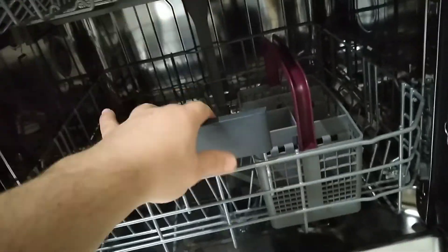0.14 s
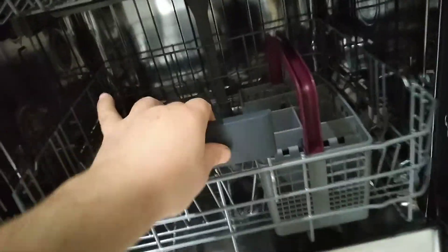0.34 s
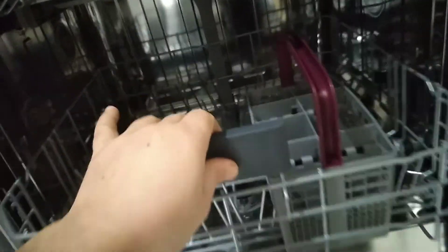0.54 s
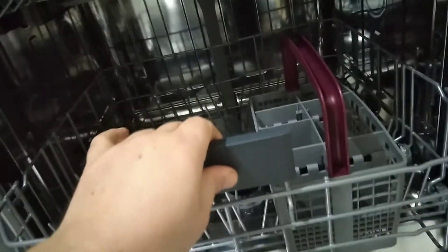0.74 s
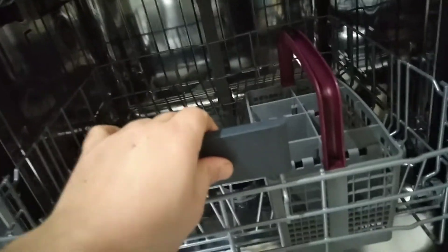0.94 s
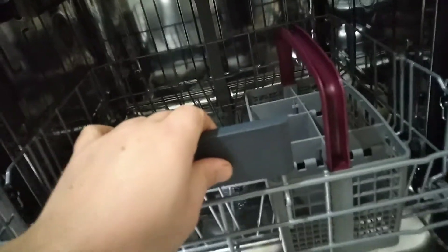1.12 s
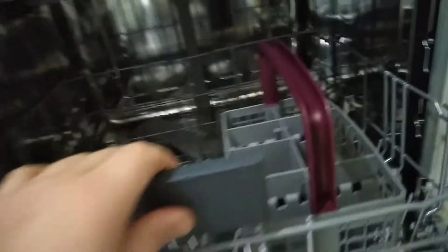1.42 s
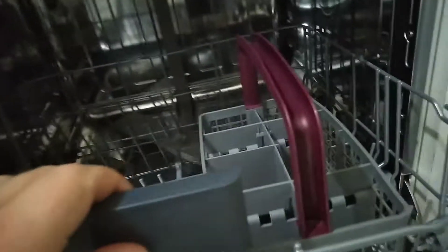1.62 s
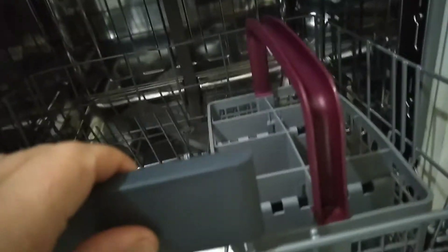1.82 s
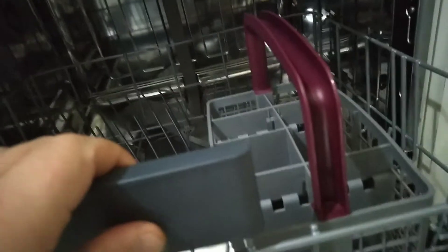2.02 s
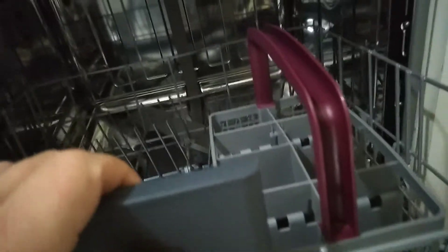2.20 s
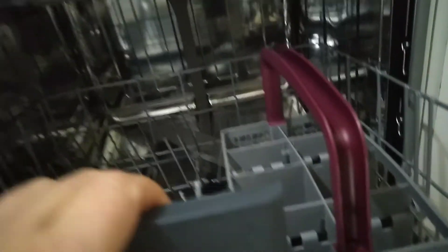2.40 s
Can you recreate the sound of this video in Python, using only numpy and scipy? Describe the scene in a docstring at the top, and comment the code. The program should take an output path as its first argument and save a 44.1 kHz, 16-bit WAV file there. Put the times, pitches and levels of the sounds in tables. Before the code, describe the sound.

A dishwasher rack rattles as it is pulled out, with quick clacks building to a hard bang, then low wheel rumble, thin sliding hiss and a few softer knocks, heard close in a quiet kitchen.

```python
"""Over a quiet kitchen rumble, loose wires chatter and wheels rumble as a dishwasher rack is drawn out.
Rack and plastic cutlery basket knock: each contact excites a clack, decaying modes and a diffuse tub echo.
Dying sinusoids give hollow thunks and wire clicks; coloured noise and gliding bands make the runners hiss.
In the quiet stretches the level drops out abruptly, once stuttering back; a faint whine sets in late."""
import sys
import numpy as np
from scipy import signal
from scipy.fft import rfft, irfft, next_fast_len
from scipy.io import wavfile
from scipy.ndimage import uniform_filter1d, map_coordinates

SR = 44100
rng = np.random.default_rng(int(sys.argv[2]) if len(sys.argv) > 2 else 0)


def store_wav(level_fs):
    """Save 16-bit WAV to argv[1]."""
    pcm = np.round(np.clip(np.atleast_2d(level_fs), -1, 1) * 32767)
    wavfile.write(sys.argv[1], SR, pcm.T.astype(np.int16))


N = 112454  # length [samples]


def amp(db):
    """Decibels to amplitude ratio: 20 dB is a factor of ten."""
    return 10 ** (np.asarray(db) / 20)


def unit(x):
    """Normalisation to a root-mean-square value of 1."""
    return x / np.sqrt(np.mean(x ** 2) + 1e-20)


def along(points, hz):
    """Interpolation of (frequency, value) points on a logarithmic frequency axis."""
    point_hz, value = np.transpose(points)
    return np.interp(np.log(hz + 1), np.log(point_hz + 1), value)


def level(rows):
    """Amplitude envelope, linear in decibels between (time, level) points."""
    return amp(np.interp(np.arange(N) / SR, *np.transpose(rows)))


def wobble(rate):
    """Band-limited random modulation: a spline through `rate` random knots per second."""
    knots = rng.standard_normal(int(N * rate / SR) + 4)
    return map_coordinates(knots, [np.arange(N) * rate / SR])


def filtered(x, response):
    """Linear zero-phase filtering: the spectrum times a real response of frequency."""
    m = next_fast_len(N + SR // 2)
    return irfft(rfft(x, m) * response(np.fft.rfftfreq(m, 1 / SR)), m)[:N]


def noise(colour):
    """Coloured noise of rms 1: white noise shaped by a spectral envelope."""
    white = rng.standard_normal(N)
    return unit(filtered(white, lambda hz: amp(along(colour, hz))))


def floor():
    """Steady background noise: a quiet kitchen rumble of fixed spectrum."""
    # spectrum of the rumble: (frequency [Hz], relative level [dB])
    rumble_colour = [(25, -1), (70, 6.5), (130, -7), (300, -25), (1000, -40), (4000, -44), (15000, -31)]
    return amp(-71.5) * noise(rumble_colour)


def coloured(x, tilt_db, thud_db):
    """Minimum-phase contact filter: harder contacts tilt upward, each spot adds its own resonances."""
    # spectrum of a knock: (frequency [Hz], relative level [dB])
    knock_colour = [(30, -32), (90, -6), (200, -3), (360, 7.5), (750, 3), (1300, -2.5), (2800, -17),
                    (3700, -27.5), (6300, -29), (8000, -39), (15500, -50.5)]
    tilt_top_hz = 7060  # hardness brightens up to here
    spot_depth_db, spot_band_hz = 1.5, 417
    m = 2 * next_fast_len(len(x))
    hz = np.fft.rfftfreq(m, 1 / SR)
    spot = map_coordinates(rng.standard_normal(size=400), [hz / spot_band_hz], mode='mirror')
    spot = spot * np.minimum(hz / 2500, 1)
    db = along(knock_colour, hz) + spot_depth_db * spot
    db = db + tilt_db * np.log2(1 + np.minimum(hz, tilt_top_hz) / 500)
    db = db + thud_db / (1 + (hz / 220) ** 4)
    # folding the cepstrum onto positive time makes the response causal
    cepstrum = irfft(np.log(unit(amp(db))))
    cepstrum[1:m // 2] *= 2
    cepstrum[m // 2 + 1:] = 0
    return irfft(rfft(x, m) * np.exp(rfft(cepstrum)))[:len(x)]


def answer():
    """Impulse response of one contact: a push, a plastic clack and tub echo; apart from it, the rack's modes."""
    # modes of the rack in its tub: (frequency [Hz], relative level [dB], 60 dB decay time [s])
    rack_modes = [(256, -8.5, 1), (377.3, 4, 0.29), (565.6, 3.5, 0.28), (662.3, 2.5, 0.32),
                  (790.4, 3.5, 0.27), (1099, 5, 0.32), (1393, 0, 0.29), (1533, -5, 0.17), (1780, 2.5, .22),
                  (2420, 3, 0.48), (2620, 2, 0.084), (5370, 9, 0.16)]
    # reverberation of the tub: (frequency [Hz], 60 dB decay time [s])
    tub_decay = [(100, 0.62), (300, 0.26), (800, 0.19), (2000, 0.29), (5000, 0.35), (13000, .33)]
    clack_t60_s, push_db, tub_db = 0.038, -13.5, -3.5
    t = np.arange(SR * 2 // 3) / SR

    def unit_energy(x):
        return x / np.linalg.norm(x)

    push = amp(push_db) * (t == 0)
    clack = rng.standard_normal(len(t)) * amp(-60 * t / clack_t60_s)
    ring = 0
    for mode_hz, db, t60 in rack_modes:
        envelope = amp(db + 2 * rng.standard_normal() - 60 * t / t60)
        ring = ring + envelope * np.sin(2 * np.pi * (mode_hz * t + rng.random()))
    # noise whose bands decay at their own rates
    hz, s, z = signal.stft(rng.standard_normal(len(t)), SR, nperseg=256)
    decay = amp(-60 * s / along(tub_decay, hz)[:, None])
    tub = signal.istft(z * decay, SR, nperseg=256)[1][:len(t)]
    return push + unit_energy(clack) + amp(tub_db) * unit_energy(tub), unit_energy(ring)


def struck(tilt_db, thud_db):
    """Superposition of direct contact sound and modal ringing at one hardness."""
    body, ring = answer()
    ring = coloured(ring, tilt_db, thud_db)
    ring = amp(-5) * ring / np.linalg.norm(ring)
    return coloured(body, tilt_db, thud_db) + ring


def chatter():
    """Random impact trains convolved with contact responses; hard contacts only come with strong shaking."""
    # shaking of the loose wires: (time [s], relative level [dB])
    shaking = [(.1, -88.5), (.112, -51), (.19, -49), (.26, -41.5), (.33, -35), (.43, -40), (.56, -34.5),
               (.64, -39.5), (.75, -40.5), (.8, -45.5), (1.2, -50), (1.6, -49.5), (1.9, -69), (2.22, -54.5),
               (2.26, -40.5), (2.34, -51)]
    taps_per_s, scatter_db = 130, 3  # mean rate at each spot, spread of tap strength
    hard_from_db, hard_db = -35.5, -5.5  # shaking below the first weakens the hard contacts further
    soft_tilt_db, hard_tilt_db, soft_edge_hz = -5, 3, 1520
    shake = level(shaking)

    def contacts(gain, tilt_db):
        happens = rng.random(N) < taps_per_s / SR
        taps = happens * amp(scatter_db * rng.standard_normal(N))
        return signal.fftconvolve(unit(taps) * gain, struck(tilt_db, thud_db=-2.0))[:N]

    hard_shake = shake * np.minimum(shake / amp(hard_from_db), 1)
    soft = sum(contacts(shake, soft_tilt_db) for spot in range(2))
    hard = sum(contacts(hard_shake, hard_tilt_db) for spot in range(2))
    soft = filtered(soft, lambda hz: 1 / (1 + (hz / soft_edge_hz) ** 8))
    return amp(-6.0) * (soft + amp(hard_db) * hard)


def wheels():
    """Rolling noise: a coloured rumble under slow random amplitude modulation."""
    # rolling: (time [s], level [dB])
    rolling = [(.1, -93), (.13, -50.5), (.45, -51.5), (.66, -64), (.72, -36.5), (.86, -42.5), (1.02, -46),
               (1.2, -48), (1.32, -43.5), (1.47, -47), (1.7, -44.5), (1.86, -54), (1.99, -49),
               (2.08, -46.5), (2.3, -46.5), (2.55, -58)]
    # spectrum of the rolling: (frequency [Hz], relative level [dB])
    rolling_colour = [(25, -35), (50, -9.5), (82, 1), (125, -6.5), (160, -2.5), (280, -6), (365, -0.5),
                      (450, -5.5), (680, -17.5), (950, -44.5), (2000, -35), (5000, -56)]
    uneven = noise(rolling_colour) * amp(2 * wobble(35.05))
    return level(rolling) * unit(uneven)


def knocks():
    """Impact excitation: rack and basket bump against the runners and each other."""
    # bumps: (time [s], relative level [dB], brightness [dB per octave], low thud [dB])
    bumps = [(0.137, -35.5, -9, -14), (.177, -35, -18, 6.5), (.2005, -23, -16.5, -13),
             (0.217, -26, -10.5, -25), (.277, -26.5, -3.5, -9), (0.288, -39.5, 8, 2), (.379, -21, 3, 4),
             (.385, -23.5, 1, 3), (.406, -34.5, 10, 10), (.489, -14.5, 0.5, -1), (.497, -18.5, -11, -5),
             (.519, -17, -1.5, -8), (.531, -23, 6, 0), (0.556, -28, 8, -18.5), (.6698, -15, 3.5, 13),
             (0.6724, -10, 2, -3), (.684, -12, 3, 0.5), (.696, -18.5, 3, 17.5), (.842, -39.5, 2.5, -12),
             (.921, -28, -4, -3), (1.311, -35.5, -19.5, -1), (1.375, -25, -9.5, 9.5),
             (1.401, -30.5, -10.5, 10), (1.575, -33, 2.5, -10), (1.993, -38, 10, 3),
             (2.237, -25.5, 0.5, -12), (2.26, -29, 2.5, -11), (2.275, -26.5, 6, -5), (2.467, -41.5, 1, -16)]
    common_gain_db = 16
    out = np.zeros(N + SR)
    for s, db, tilt_db, thud_db in bumps:
        hit = struck(tilt_db, thud_db)
        out[round(s * SR):][:len(hit)] += amp(db + common_gain_db) * hit
    return out[:N]


def dropouts(x):
    """Gated attenuation: the level drops out, less deeply in the bass, and stutters back in short bursts."""
    # drops: (start [s], end [s], gain [dB])
    drops = [(0.151, 0.174, -7), (0.181, 0.198, -13.5), (1.136, 1.307, -11.5), (1.77, 1.992, -14.5),
             (2.44, 2.468, -12), (2.472, 2.603, -12.5)]
    # bursts: (start [s], end [s])
    bursts = [(1.148, 1.175), (1.175, 1.188), (1.188, 1.208), (1.213, 1.221), (1.221, 1.238), (1.242, 1.25),
              (1.259, 1.263), (1.278, 1.286)]
    fade_s, burst_db = .002, 10.5
    bass_share, bass_edge_hz = 0.94, 92  # part of the drop, in dB, that reaches the bass
    t = np.arange(N) / SR

    def span(start, end):
        return np.clip(np.minimum(t - start, end - t) / fade_s + .5, 0, 1)

    db = sum(depth * span(start, end) for start, end, depth in drops)
    db = db + burst_db * sum(span(start, end) for start, end in bursts)
    bass = filtered(x, lambda hz: 1 / (1 + (hz / bass_edge_hz) ** 4))
    return bass * amp(bass_share * db) + (x - bass) * amp(db)


def note(s, db, hz, t60):
    """Free damped vibration: one exponentially dying partial that starts at s."""
    attack_s = .0015  # time constant
    t = np.maximum(np.arange(N) / SR - s, 0)
    return amp(db - 60 * t / t60) * np.sin(2 * np.pi * hz * t) * (1 - np.exp(-t / attack_s))


def thunks():
    """Single-mode resonance: hollow notes of the basket and the tub's panels."""
    # hollow notes: (time [s], level [dB], frequency [Hz], 60 dB decay time [s])
    hollow_notes = [(0.2034, -16.5, 435, 0.02), (.335, -32.5, 334, 0.18), (.489, -23.5, 781, 0.16),
                    (.49, -25, 268, 0.17), (.696, -16.5, 361, 0.11), (.752, -26, 370, 0.093),
                    (.872, -34, 360, 0.23), (1.38, -40.5, 161.9, 1), (1.376, -30.5, 477, 0.14),
                    (1.53, -30.5, 330, .11), (1.578, -33.5, 350.2, 0.25), (1.681, -37.5, 722, 0.059),
                    (1.682, -33.5, 356.6, 0.15), (1.993, -37.5, 355, 0.16), (2.238, -34, 1893, 0.072),
                    (2.259, -24, 482, 0.071), (2.26, -31, 1070, 0.12), (2.468, -37, 1450, 0.037)]
    return sum(note(*row) for row in hollow_notes)


def clicks():
    """Modal superposition: wire strikes wire and a few short bright modes ring together."""
    # strikes: (time [s], level [dB], brightness [dB per octave above the first mode])
    strikes = [(0.49, -30.5, -3), (0.6684, -16, -13), (.684, -24, -1.5), (1.991, -51.5, 12),
               (2.016, -51.5, 15.5)]
    # modes of a wire: (frequency [Hz], relative level [dB], 60 dB decay time [s])
    wire_modes = [(2009, -3.5, 0.032), (2606, -3.5, 0.05), (4204, -10, 0.023), (5230, -11, 0.05)]
    first_hz = wire_modes[0][0]
    out = np.zeros(N)
    for s, db, tilt_db in strikes:
        for hz, relative_db, t60 in wire_modes:
            out += note(s, db + relative_db + tilt_db * np.log2(hz / first_hz), hz, t60)
    return out


def streaked(x, depth_db):
    """Time-varying spectral weighting: narrow resonances come and go along the slide."""
    z = signal.stft(x, nperseg=1024)[2]
    field = uniform_filter1d(rng.standard_normal(z.shape), size=4, axis=0)  # across frequency
    field = uniform_filter1d(field, size=22, axis=1)  # along time
    return unit(signal.istft(z * amp(depth_db * unit(field)), nperseg=1024)[1][:N])


def singing():
    """Narrow-band friction: bands glide up as the rack gets under way and down as it slows."""
    # bands: (peak time [s], frequency at the peak [Hz], level over the thin hiss [dB], glide [Hz per s])
    bands = [(1.07, 1800, -7.5, 500.5), (1, 3290, -6, 4.5), (1.06, 4380, 0, 1500.5),
             (1.06, 5300, -4.5, 499), (1.04, 6950, -5, 0.5), (1.5, 1850, -3.5, -200),
             (1.4, 3500, -14, -400), (1.5, 3950, -6, -1000), (1.62, 6500, -6.5, -700)]
    # the bands blur as the rack runs on: (peak time [s], rate of random modulation [knots per s])
    blur = [(1.1, 200), (1.5, 430)]
    spread_s = 0.16  # a band falls to 1/e this far from its peak
    out = np.zeros(N)
    for s, hz, db, glide in bands:
        t = np.arange(N) / SR - s
        phase = 2 * np.pi * (hz * t + glide * t ** 2 / 2)
        rate = np.interp(s, *np.transpose(blur))
        band = unit(wobble(rate) * np.cos(phase) + wobble(rate) * np.sin(phase))
        out += amp(db) * np.exp(-(t / spread_s) ** 2) * band
    return out


def runners():
    """Sliding friction noise with a fine grain: thin and singing at first, fuller when the rack is far out."""
    # hisses: (time [s], level [dB])
    thin_level = [(.2, -100), (.38, -67.5), (.85, -67.5), (.96, -70.5), (1.12, -63.5), (1.36, -58.5),
                  (1.52, -62), (1.68, -60.5), (1.78, -68), (1.95, -78), (2.55, -84)]
    full_level = [(2.0, -50.5), (2.1, -51.5), (2.22, -46), (2.34, -51), (2.44, -50.5), (2.55, -56.5)]
    # their spectra: (frequency [Hz], relative level [dB])
    thin_colour = [(1200, -31), (2200, -2.5), (3450, -0.5), (4500, 4.5), (6700, 7), (7700, -13),
                   (9000, 1.5), (10800, 8.5), (15500, -5)]
    full_colour = [(250, -14.5), (550, 9.5), (950, -4), (1400, 6), (2200, -2), (3150, -4.5), (3450, -9),
                   (3900, -1.5), (4550, -9), (5050, -1), (6000, -16.5), (6700, -11), (8000, -21),
                   (12500, -22), (15500, -26)]
    dull_from_s, dull_db_per_s, dull_above_hz = 1.31, 27.5, 8560  # the top of the thin hiss fades
    full_start_s = 1.992
    t = np.arange(N) / SR
    thin = unit(streaked(noise(thin_colour), depth_db=2.5) * amp(1.1 * wobble(270)))
    top = filtered(thin, lambda hz: hz > dull_above_hz)
    thin = thin - top + top * amp(-dull_db_per_s * np.maximum(t - dull_from_s, 0))
    full = unit(streaked(noise(full_colour), depth_db=1.1) * amp(.5 * wobble(370)))
    return level(thin_level) * (thin + singing()) + level(full_level) * full * (t > full_start_s)


def whine():
    """Steady pure tones: a faint electrical whine sets in."""
    # tones: (frequency [Hz], rms level [dB])
    whine_tones = [(10000, -91), (12500, -91)]
    start_s = 1.4
    t = np.arange(N) / SR
    tones = sum(amp(db) * np.sqrt(2) * np.sin(2 * np.pi * hz * t) for hz, db in whine_tones)
    return tones * np.clip((t - start_s) * 20, 0, 1)  # fades in over 50 ms


def scene():
    """Linear superposition: the dropouts gate the rack's sounds but spare the rumble and the whine."""
    rack = chatter() + wheels() + knocks() + thunks() + clicks() + runners()
    return (floor() + dropouts(rack) + whine())[None]


def record(dry):
    """Band limitation: nothing is kept from 16 kHz up."""
    return filtered(dry[0], lambda hz: hz < 16000)[None]


dry = scene()
out = record(dry)
store_wav(out)
```